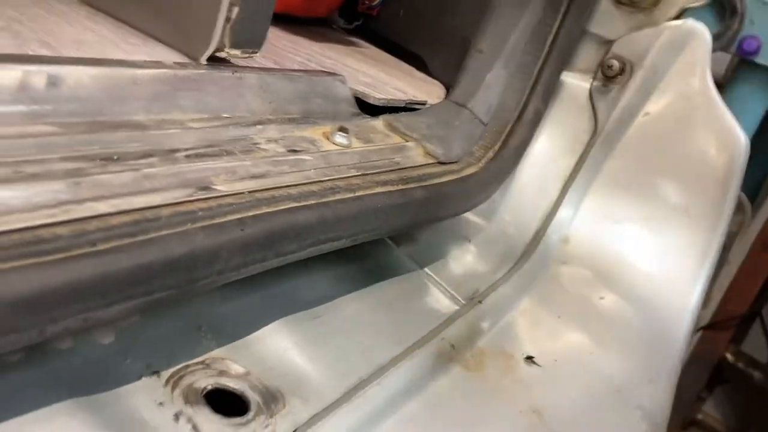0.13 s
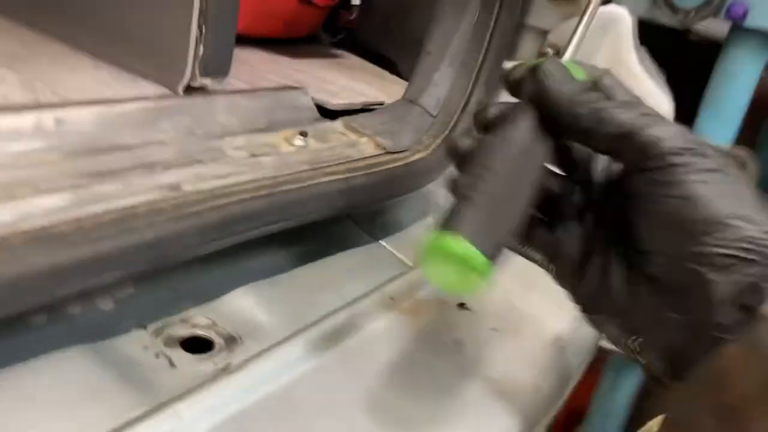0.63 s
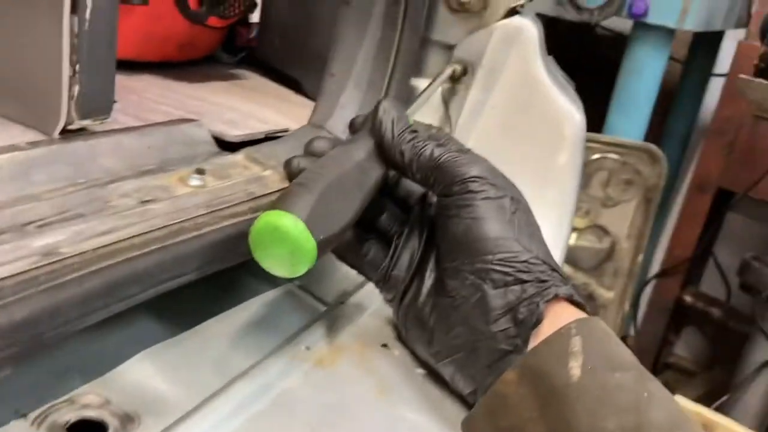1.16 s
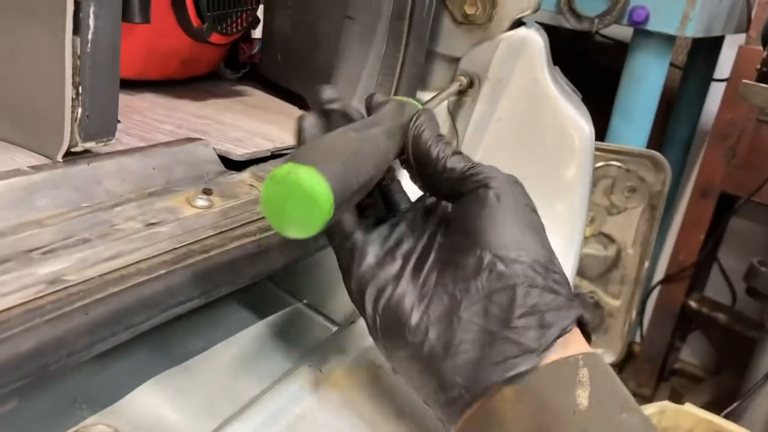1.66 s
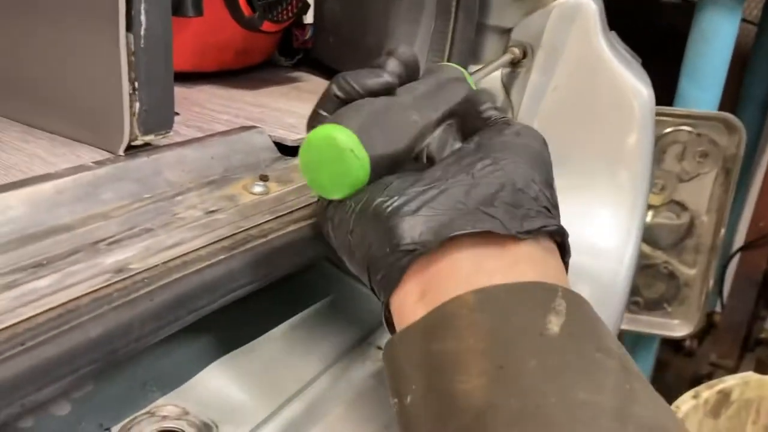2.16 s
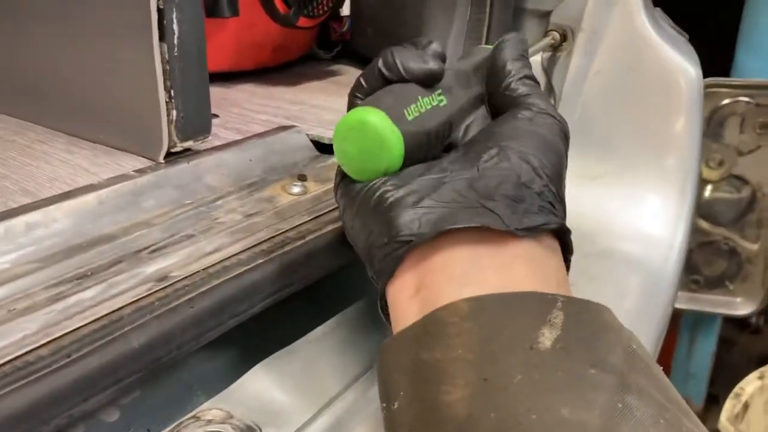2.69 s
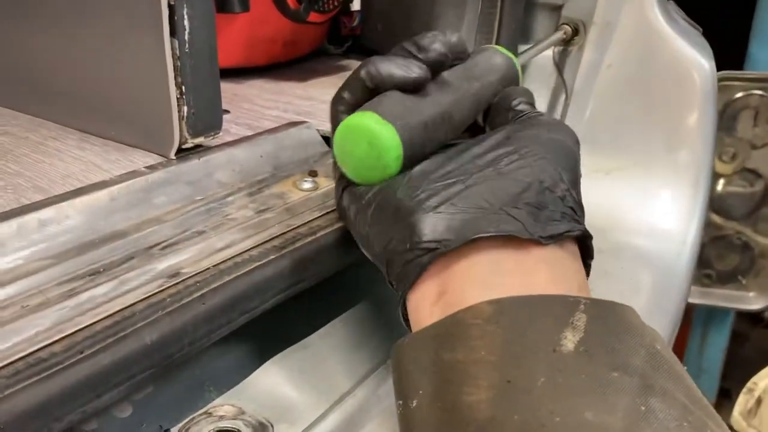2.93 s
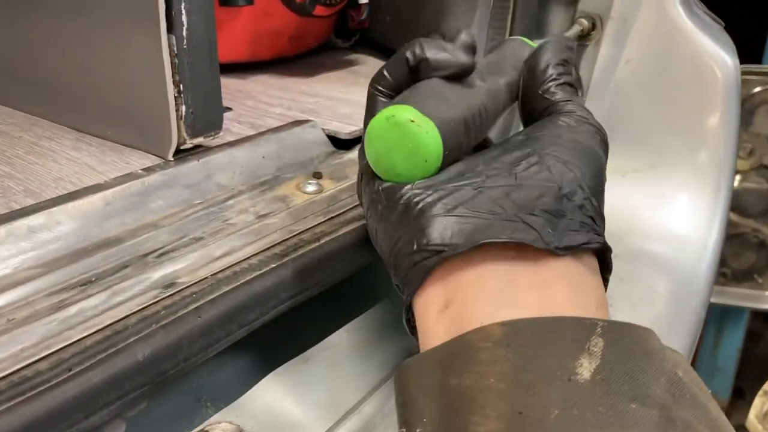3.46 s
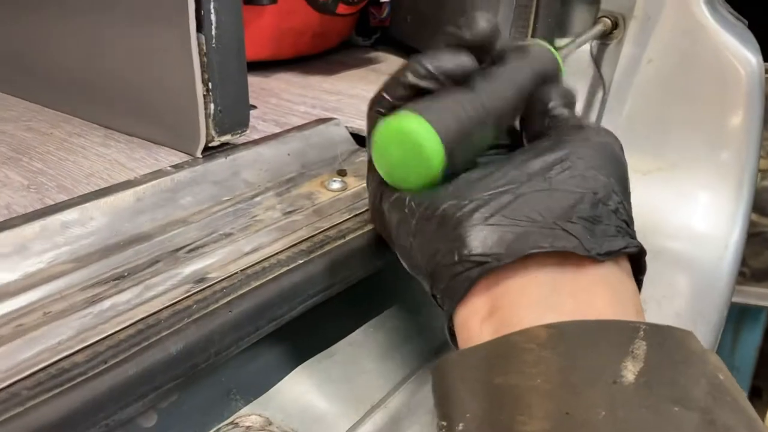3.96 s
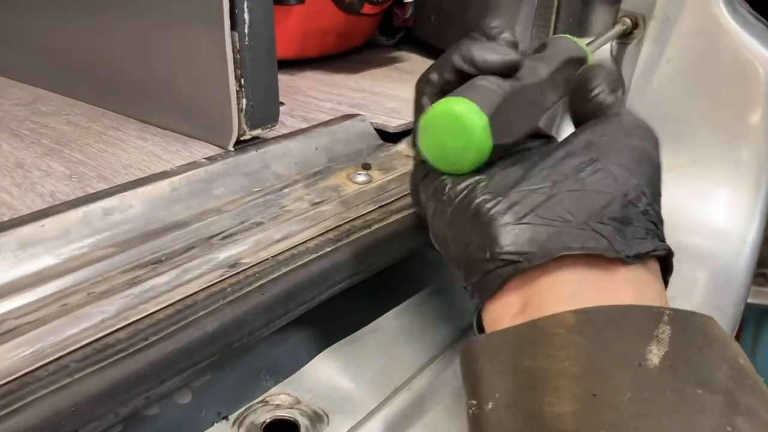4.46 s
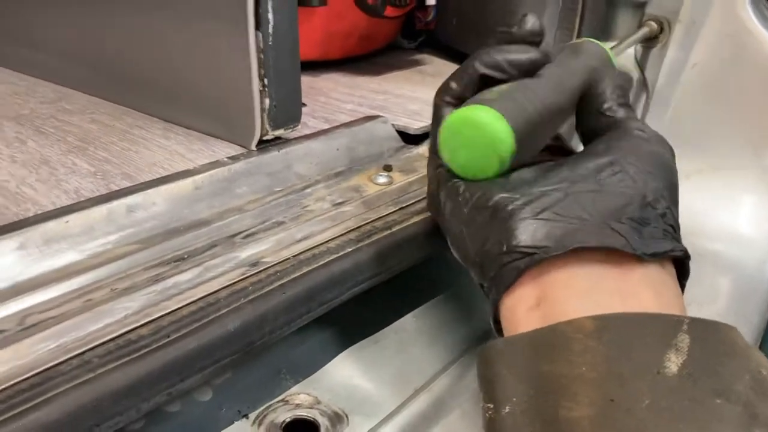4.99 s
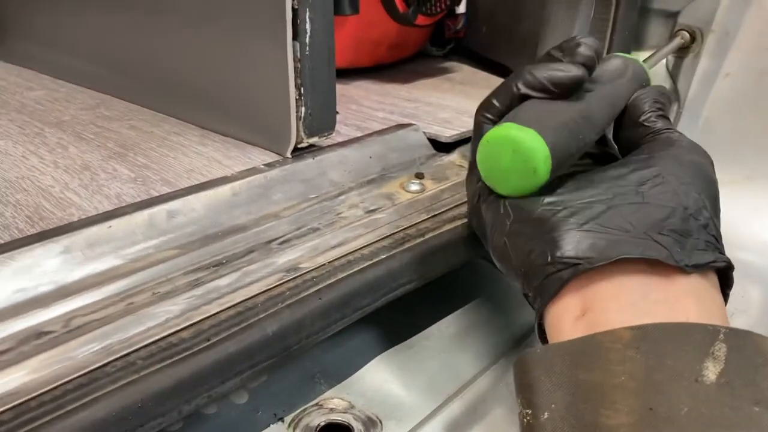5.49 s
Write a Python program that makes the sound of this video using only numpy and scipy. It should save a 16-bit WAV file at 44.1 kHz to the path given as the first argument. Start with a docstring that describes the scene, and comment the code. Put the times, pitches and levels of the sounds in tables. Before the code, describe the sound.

A quiet reach with soft rubber rustling, then a cluster of clanky, short-ringing panel knocks and scraping as the tool tip seeks the screw. A brief lull follows, then regular glove-on-plastic swishes, two or three per second, dotted with sharp tiny ticks and very faint bumps. One strong rattling knock comes near the end. Two close microphones, small dry room, short tail, faint low rumble.

```python
"""A glove rustles on a screwdriver handle, with steel clicks, knocks and scrapes on a vehicle's bodywork.
The rustle is filtered noise and random slips that swell with each twist; part of it passes into the panel.
Blows crack, crunch and ring the panel modes, soft thuds ring the low ones, and the bit ticks in the screw.
A quiet garage answers with a short tail over a low rumble and faint microphone hiss.
Two microphone ports hear it all a few centimetres apart."""
import sys
import numpy as np
from scipy import signal
from scipy.fft import rfft, irfft
from scipy.io import wavfile
from scipy.ndimage import uniform_filter1d

SR = 44100
rng = np.random.default_rng(int(sys.argv[2]) if len(sys.argv) > 2 else 0)


def transcribe(u):
    """Save the signal u as a 16-bit wav file named by the first command-line argument.

    u: samples, shape (n,) or (channels, n), limited to [-1, 1]; the rate is SR.
    q: integer samples, one column per channel.
    """
    v = np.clip(np.atleast_2d(u).T, -1, 1)
    q = np.round(v * 32767).astype(np.int16)
    wavfile.write(sys.argv[1], SR, q)


def rack_gain(trim_db):
    """Turn a fader trim in dB into the linear factor to multiply a signal by."""
    fader = np.asarray(trim_db, float)
    return 10 ** (fader / 20)


N = 247842  # length in samples

# spectrum of the crisp rustle and of the fine grit in a scrape: hz, level_db (relative)
CRISP_SPECTRUM = [(4500, -14), (6100, -15), (8000, -2), (10300, 0.5), (13000, -2), (15500, -10)]
# spectrum of the dense high panel modes: hz, level_db (relative)
CRUNCH_SPECTRUM = [(600, -80), (1300, 2.5), (2000, 6.5), (3000, -2), (4500, -4), (7000, -29)]


def evened(x):
    """Scales to rms 1."""
    return x / np.sqrt(np.mean(x ** 2) + 1e-20)


def curve(rows):
    """Draws straight lines between the rows of a time table: one value a sample for each column."""
    s, *columns = np.transpose(rows)
    return [np.interp(np.arange(N) / SR, s, c) for c in columns]


def swell(t, peak_s, rise_s, fall_s):
    """A rounded hump, 1 at its peak and a third of that one rise before or one fall after."""
    away = np.where(t < peak_s, (peak_s - t) / rise_s, (t - peak_s) / fall_s)
    return np.exp(-1.1 * np.minimum(away, 4) ** 2.58)


def coloured(x, points):
    """Filters by a (Hz, dB) spectrum, then scales to rms 1."""
    hz, db = np.transpose(points)
    log_hz = np.log(np.fft.rfftfreq(N, 1 / SR) + 1)
    gain = rack_gain(np.interp(log_hz, np.log(hz + 1), db))
    return evened(irfft(rfft(x) * gain, N))


def add(mix, start_s, sound):
    """Mixes a sound in from start_s on, cut off at the end of the mix."""
    part = mix[..., round(start_s * SR):][..., :sound.shape[-1]]
    part += sound[..., :part.shape[-1]]


def crackle(per_s, spread_db):
    """Random single-sample slips, a few of them large, scaled to rms 1."""
    size = rack_gain(spread_db * np.minimum(rng.exponential(1, (2, N)), 3))
    kicks = size * rng.standard_normal((2, N))
    return evened(kicks * (rng.random((2, N)) < per_s / SR))


def glove():
    """Dense micro-slips of rubber on plastic swell and fade with each twist and flutter within it."""
    # twists of the glove on the handle: peak_s, rustle_db, rise_s, fall_s, dull_db (against rustle_db)
    strokes = [(0.004, -56.5, 0.008, 0.049, 0.5), (0.231, -68.5, 0.6, 0.014, 5.5),
               (0.295, -62, 0.03, 0.049, 8), (0.416, -55.5, 0.02, 0.019, -0.5),
               (0.468, -51, 0.028, 0.049, -3.5), (0.655, -64, 0.099, 0.01, -7.5),
               (0.779, -67, 0.11, 0.04, -32), (1.414, -52.5, 0.038, 0.31, -5.5),
               (1.549, -73, 0.018, 0.029, 8.5), (1.899, -63.5, 0.057, 0.12, 1),
               (2.077, -58.5, 0.039, 0.025, 2), (2.117, -56, 0.01, 0.041, 1),
               (2.309, -51, 0.059, 0.069, -6), (2.5, -56.5, 0.038, 0.048, -5),
               (2.666, -48.5, 0.019, 0.054, -5), (2.885, -50.5, 0.07, 0.011, -11),
               (3.044, -45.5, 0.02, 0.042, -7), (3.223, -53, 0.05, 0.012, -4),
               (3.423, -48, 0.042, 0.054, -3), (3.587, -52.5, 0.056, 0.031, -8.5),
               (3.775, -49.5, 0.034, 0.053, -5.5), (3.869, -48.5, 0.025, 0.022, -4),
               (3.986, -50, 0.043, 0.019, -9), (4.044, -70.5, 0.03, 0.0088, 8),
               (4.168, -49, 0.022, 0.049, -4), (4.35, -55.5, 0.035, 0.033, -3),
               (4.543, -47, 0.033, 0.035, -4.5), (4.71, -50.5, 0.025, 0.031, -4),
               (4.877, -46.5, 0.01, 0.047, -5.5), (4.96, -60.5, 0.032, 0.0085, 8),
               (5.064, -63, 0.037, 0.052, 4), (5.144, -54.5, 0.019, 0.017, -5),
               (5.301, -47.5, 0.029, 0.068, -6.5), (5.488, -57, 0.018, 0.036, 4)]
    # creep of the grip between strokes; the hand is off while the tip seeks the screw: time_s, grip_db
    grip = [(0, 3.5), (.6, 1.5), (.8, -6), (.84, -16), (.96, -16), (1.13, -14.5), (1.34, -25), (1.38, -31),
            (1.7, -1), (1.96, -9), (2.02, -5), (2.2, 2), (2.38, -2.5), (2.43, -2), (2.52, 1), (2.62, 5),
            (2.8, 5), (3.3, 2.5), (4.07, -0.5), (4.9, 1.5), (5.2, 1.5), (5.44, 4), (5.62, 5.5)]
    # creep of crisp rustle, dull rustle and panel: level_db (at grip 0), db_per_grip_db
    creep = [(-69, 1.0), (-69.5, 0.78), (-81, 0)]
    # lean of the tool on the bodywork, passing rustle into the panel: time_s, level_db
    lean = [(0, -2.5), (.3, -9), (.7, -0.5), (.9, -1.5), (1.4, 9.5), (1.9, 6.5), (2.05, -9.5), (2.3, 10),
            (2.5, 0.5), (3.0, 2), (3.5, 3), (3.85, 6.5), (4.0, -0.5), (4.55, -6.5), (4.75, -1), (5.0, 0.5),
            (5.15, -4), (5.35, 6.5), (5.62, 11)]
    # dull rustle while reaching, hand open: hz, level_db (relative)
    loose_spectrum = [(600, -75), (1400, -2), (2500, 0.5), (4200, 7.5), (5600, 2.5), (6800, -2),
                      (8500, -11)]
    # dull rustle while gripping: hz, level_db (relative)
    gripped_spectrum = [(300, -42), (800, -15.5), (1450, -6), (1740, 2), (2050, -2.5), (2600, 0), (3600, 5),
                        (4600, -0.5), (6100, -9.5), (8000, -8)]
    gripped_s = 0.6
    dull_lag_s, dull_rise, dull_fall = 0.0044, 0.92, 0.96  # rise and fall as shares of the stroke's
    into_panel_db = -20  # against the dull rustle, before the lean

    t, grip_db = np.arange(N) / SR, curve(grip)[0]
    level = rack_gain(np.array([db + share * grip_db for db, share in creep]))  # rows: crisp, dull, panel
    for peak_s, db, rise_s, fall_s, dull_db in strokes:
        first = max(round((peak_s - 3 * rise_s) * SR), 0)
        near = slice(first, round((peak_s + 3 * fall_s) * SR))
        level[0, near] += rack_gain(db) * swell(t[near], peak_s, rise_s, fall_s)
        late = swell(t[near], peak_s + dull_lag_s, dull_rise * rise_s, dull_fall * fall_s)
        level[1:, near] += rack_gain(db + dull_db + np.array([[0], [into_panel_db]])) * late
    level[2] *= rack_gain(curve(lean)[0])

    slow = uniform_filter1d(rng.standard_normal((3, 1, N)), 250)
    flutter = rack_gain(1.8 * evened(slow))  # 1.8 dB rms
    fine, coarse, deep = (rng.standard_normal((2, N)) + 0.58 * crackle(per_s=1600.0, spread_db=4.0)
                          for _ in range(3))
    crisp = coloured(fine * flutter[0], CRISP_SPECTRUM)
    rough = coarse * flutter[1]
    dull = np.where(t < gripped_s, coloured(rough, loose_spectrum), coloured(rough, gripped_spectrum))
    panel = ring(0.0, -2.5, 0, spot_hz=700, spread=1.0)
    body = evened(signal.oaconvolve(deep * flutter[2], panel, axes=1)[:, :N])
    return level[0] * crisp + level[1] * dull + level[2] * body


def ring(deep_db, low_db, middle_db, spot_hz, spread=0.15, swell_s=0.0065):
    """Panel modes after one blow; low bending waves travel slowly and swell in late."""
    # modes of the panel: hz, level_db (within its group), t60_s
    modes = [(151.3, -4.5, 0.19), (187.3, 0.5, 0.17), (217.2, -5.5, 0.17), (251.5, -5, 0.28),
             (275, -6.5, 0.15), (308.2, -1, 0.21), (352, -8.5, 0.18), (374, -1.5, 0.15), (421, -7, 0.072),
             (478, -4, 0.12), (565, 2.5, 0.073), (635.4, 2.5, 0.057), (690.5, 3, .05), (763, 1, 0.044),
             (827, -2, 0.024), (900, -5.5, 0.019), (972, 0.5, 0.027), (1050, -2, 0.062), (1188, -14, 0.11)]
    t = np.arange(SR // 2) / SR
    out = np.zeros((2, len(t)))
    for hz, db, t60_s in modes:
        middle = middle_db - 6 * (np.log(hz / spot_hz) / spread) ** 2  # the spot struck favours some modes
        group_db = deep_db if hz < 220 else low_db if hz < 520 else middle
        rise_s = 0.00036 + swell_s * (250 / hz) ** 2.0
        rise = 1 - np.exp(-(t / rise_s) ** 2)
        # each mode starts at a random phase, drawn anew for every ring and row
        phase = 2 * np.pi * (hz * t + 0.3 * rng.standard_normal((2, 1)))
        out += rack_gain(group_db + db - 60 * t / t60_s) * rise * np.sin(phase)
    return out


def knocks():
    """Each blow: a short crack of steel, a crunch of dense high modes, the shaft and the ringing panel."""
    # blows on the panel: start_s, middle_db (modes from 520 Hz up), hard_db (crack against middle_db),
    # weight_db (modes of 220 to 520 Hz against middle_db), spot_hz (favoured by the spot struck)
    blows = [(0.02, -54, 16.5, -8, 810), (0.025, -60.5, 17.5, -4, 783), (0.971, -32.5, -22, -14.5, 900),
             (1.1514, -31, -32, -14.5, 840), (1.1638, -32.5, -8, -11, 760), (1.2205, -43.5, -13, 2.5, 624),
             (1.2340, -36, 9, -21, 634), (1.4465, -36, -1.5, -10, 748), (1.5175, -45.5, -4, 4.5, 640),
             (2.065, -58.5, -20, -3.5, 576), (2.2391, -52.5, -16, -10, 880), (2.655, -58, -27, -18, 640),
             (3.0593, -55, -18, -13, 580), (3.5587, -55.5, 1, -11, 700), (4.3595, -59.5, -14, -6, 970),
             (4.9691, -53, -6, -4, 970), (5.3051, -51, 3, 3, 600), (5.3128, -40, -2, -25, 610),
             (5.3168, -30, -14, -10, 1065), (5.323, -31, -40, 6.5, 565), (5.397, -54.5, -16, 14.5, 570)]
    # steel on steel: hz, level_db (relative)
    crack_spectrum = [(3000, -4), (4500, 13), (6000, -6), (8000, 9.5), (10500, 11), (13000, -30),
                      (16000, -24)]
    # the singing steel shaft: hz, level_db (against the crack), t60_s
    shaft = (2884, -18, .12)
    # harder blows crunch more and reach the deepest modes: dB against middle_db, dB per dB of hardness
    crunch_db, crunch_per_hard, deep_db, deep_per_hard = -3, 0.54, -6.5, 0.52

    out, t = np.zeros((2, N)), np.arange(5000) / SR
    sharp = coloured(rng.standard_normal((2, N)), crack_spectrum)
    dense = coloured(rng.standard_normal((2, N)), CRUNCH_SPECTRUM)
    crack_level, crunch_level = np.zeros((2, N))
    crack_fade = np.exp(-t / 0.0013) + 0.1 * np.exp(-t / 0.006)
    crunch_fade = np.exp(-t / 0.0061) + 0.23 * np.exp(-t / 0.019)
    shaft_hz, shaft_db, t60_s = shaft
    for start_s, db, hard_db, weight_db, spot_hz in blows:
        add(crack_level, start_s, rack_gain(db + hard_db) * crack_fade)
        add(crunch_level, start_s, rack_gain(db + crunch_db + crunch_per_hard * hard_db) * crunch_fade)
        shaft_level = rack_gain(db + hard_db + shaft_db - 60 * t / t60_s)
        add(out, start_s, shaft_level * np.sin(2 * np.pi * shaft_hz * t)[None])
        add(out, start_s, ring(db + deep_db + deep_per_hard * hard_db, db + weight_db, db, spot_hz))
    return out + crack_level * sharp + crunch_level * dense


def thuds():
    """Gloved knuckles and handle bump the panel softly and ring mostly the low modes."""
    # bumps: start_s, deep_db (modes under 220 Hz), low_db (modes of 220 to 520 Hz against deep_db)
    bumps = [(.976, -41, -8), (1.166, -32.5, -8), (1.238, -34, -9), (1.526, -44, -4), (2.079, -60, -17),
             (2.252, -72, -4), (2.299, -63, 2), (2.93, -60.5, -26), (3.07, -56, -20), (3.331, -63, -12),
             (3.459, -59, -8), (4.358, -65.5, -1), (4.968, -75, -4)]
    out = np.zeros((2, N))
    for start_s, db, low_db in bumps:
        add(out, start_s, ring(db, db + low_db, db - 25, spot_hz=600, swell_s=0.0069))
    return out


def scrapes():
    """Uneven slips of the dragged tip drive the middle modes of the panel and crunch."""
    # tip dragged over the panel: peak_s, level_db, rise_s, fall_s
    drags = [(.81, -71.5, 0.036, 0.069), (1.049, -48, 0.023, 0.037), (1.223, -40.5, 0.011, 0.018),
             (1.519, -48, 0.024, 0.014)]
    t = np.arange(N) / SR
    level = sum(rack_gain(db) * swell(t, peak_s, rise_s, fall_s) for peak_s, db, rise_s, fall_s in drags)
    slips = crackle(per_s=3300.0, spread_db=2.5)
    body = ring(-32, -17.0, 0, spot_hz=787, spread=0.31)
    driven = signal.oaconvolve(level * slips, body / np.linalg.norm(body[0]), axes=1)[:, :N]
    crunch = rack_gain(-8.5) * coloured(slips, CRUNCH_SPECTRUM)
    grit = rack_gain(-24.5) * coloured(slips, CRISP_SPECTRUM)
    return driven + level * (crunch + grit)


def ticks():
    """The bit in the screw head: a few damped cycles plus a wide snap that grows with pitch."""
    # ticks: start_s, level_db, pitch_hz
    clicks = [(0.132, -49.5, 4100), (0.214, -46.5, 4250), (0.233, -53, 4410), (0.402, -50, 4050),
              (0.41, -50, 4100), (0.598, -52.5, 1480), (0.691, -65, 1310), (1.648, -53, 4570),
              (1.978, -43, 8700), (2.2, -58, 760), (2.2, -49.5, 1810), (2.238, -55, 1510),
              (2.457, -48.5, 8100), (2.518, -42.5, 4260), (2.654, -41, 3600), (2.86, -42, 8000),
              (2.893, -43.5, 4160), (3.036, -39, 8240), (3.084, -45, 8500), (3.123, -54, 1740),
              (3.199, -44, 7670), (3.294, -44, 4000), (3.409, -42, 7570), (3.559, -44.5, 1700),
              (3.654, -52, 3830), (3.768, -50, 7640), (3.958, -42.5, 3400), (3.985, -45, 8160),
              (4.142, -51, 3650), (4.153, -55, 8170), (4.513, -50, 8100), (4.685, -47, 2960),
              (4.702, -47, 3750), (4.873, -43.5, 7520), (5.207, -47, 4100), (5.246, -53, 4000),
              (5.383, -46, 3860), (5.426, -50, 3980), (5.535, -53, 4000)]
    out, t = np.zeros((2, N)), np.arange(300) / SR
    soft_start = t / 0.0004 * np.exp(1 - t / 0.0004)  # peaks after 0.4 ms
    for start_s, db, hz in clicks:
        snap = (hz / 8000) ** 2 * rng.standard_normal((2, len(t))) * np.exp(-t / 0.00033)
        cycles = np.sin(2 * np.pi * hz * t) * soft_start
        add(out, start_s, rack_gain(db) * (cycles + snap))
    return out


def garage(x):
    """Sparse reflections of random sign from 3 ms on; the lower part dies first, the treble lingers."""
    t = np.arange(SR // 2) / SR
    signs = rng.choice([-1., 1.], (2, len(t)))
    taps = signs * (rng.random((2, len(t))) < 0.05) * (t > 0.003)
    low = uniform_filter1d(taps, 20)
    low_tail = 1.2 * evened(low) * rack_gain(-60 * t / 0.15)  # t60 0.15 s
    treble_tail = 0.5 * evened(taps - low) * rack_gain(-60 * t / 0.36)  # t60 0.36 s
    tail = low_tail + treble_tail
    return signal.oaconvolve(x, tail / np.linalg.norm(tail[0]), axes=1)[:, :N]


def rumble():
    """Low room noise that swells, one deep bump near the start, and faint microphone hiss."""
    # swells as hand and body shift: peak_s, level_db, rise_s, fall_s
    swells = [(.1, -64.5, 0.047, 0.098), (.48, -68.5, 0.11, 0.17), (1.0, -63, .04, 0.044),
              (1.21, -59.5, 0.024, 0.14), (1.58, -60, .09, 0.062), (1.8, -67, 0.026, 0.085),
              (2.101, -67.5, 0.056, 0.19), (2.7, -68, 0.033, 0.034), (2.95, -67, 0.06, 0.016),
              (3.1, -62, 0.073, 0.048), (3.33, -73, 0.039, 0.015), (3.46, -62, 0.015, 0.084),
              (5.01, -63.5, 0.017, 0.021), (5.34, -58, 0.03, .06), (5.48, -66, 0.015, 0.055)]
    # spectrum of the rumble: hz, level_db (relative, per Hz)
    air_spectrum = [(12, -3), (20, -22), (49, 3), (78, 2.5), (113, 1), (154, -7), (373, -11), (424, -16.5),
                    (857, -22), (1500, -21), (1950, -45), (3300, -120)]
    # the deep bump: foot_s (one rise before its peak), level_db, pitch_hz, rise_s, fall_s
    deep_bump = (.05, -48, 60, .035, .025)
    steady_db, hiss_db = -68.5, -91

    t = np.arange(N) / SR
    level = rack_gain(steady_db) + sum(rack_gain(db) * swell(t, peak_s, rise_s, fall_s)
                                 for peak_s, db, rise_s, fall_s in swells)
    foot_s, db, hz, rise_s, fall_s = deep_bump
    bump = rack_gain(db) * swell(t, foot_s + rise_s, rise_s, fall_s) * np.sin(2 * np.pi * hz * t)
    air = level * coloured(rng.standard_normal((2, N)), air_spectrum)
    return bump + air + rack_gain(hiss_db) * rng.standard_normal((2, N))


def scene():
    """Row 0 is what the left port hears, row 1 a twin of the same events with noise of its own."""
    hits = knocks() + thuds() + scrapes() + ticks()
    return hits + rack_gain(-15.5) * garage(hits) + glove() + rumble()


def low_pass(x):
    """Removes everything above the highest recorded frequency."""
    return signal.sosfilt(signal.butter(12, 16850, fs=SR, output="sos"), x)


def record(dry):
    """The right port hears a phase-shifted share of the left sound plus a share of its own, band-limited."""
    # right port against left: hz, lead_rad, level_db, likeness (0-1)
    ports = [(0, 0, 0, .88), (100, 0, 0, .9), (160, 0, 0, .975), (350, -.15, -.3, .94),
             (700, -.4, -.7, .86), (1200, -.7, -2.5, .8), (1800, -1.3, -3.5, .68), (3300, -2.4, -5.5, .68),
             (4300, -.7, -6, .3), (4700, 2.3, -3, .3), (5300, 3.14, 0, .9), (6200, 5.1, 0, .5),
             (6900, 6.28, 0, .99), (9100, 9.42, 0, .99), (13550, 15.7, 0, .99), (15800, 18.9, 0, .99)]
    edge_hz = 15850  # both ports hear only what lies below
    hz = np.fft.rfftfreq(N, 1 / SR)
    at_hz, *columns = np.transpose(ports)
    lead_rad, db, same = (np.interp(hz, at_hz, c) for c in columns)
    same = np.clip(same, 0, 1)
    left, own = rfft(dry) * (hz < edge_hz)
    blend = same * left + np.sqrt(1 - same ** 2) * own
    right = rack_gain(db) * np.exp(1j * lead_rad) * blend
    mix = irfft(np.array([left, right]), N)
    return low_pass(mix)


dry = scene()
out = record(dry)
transcribe(out)
```